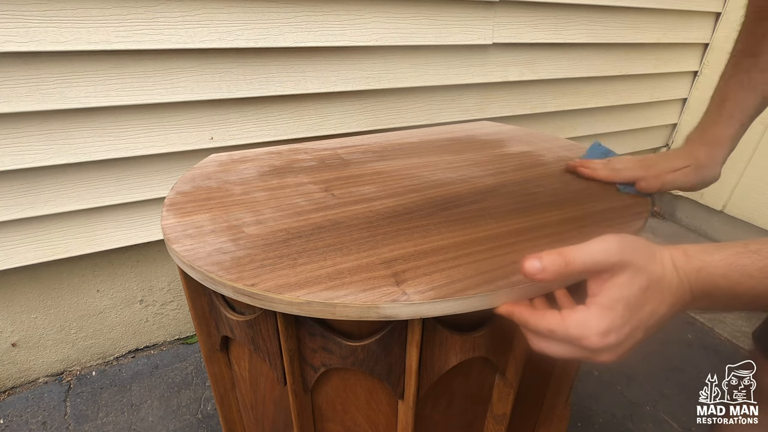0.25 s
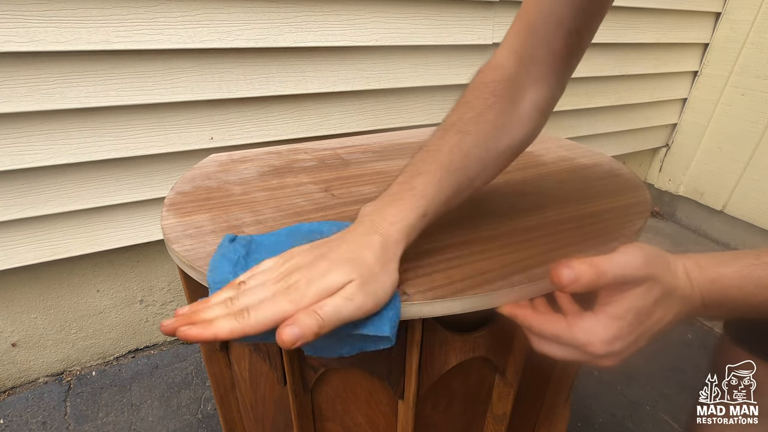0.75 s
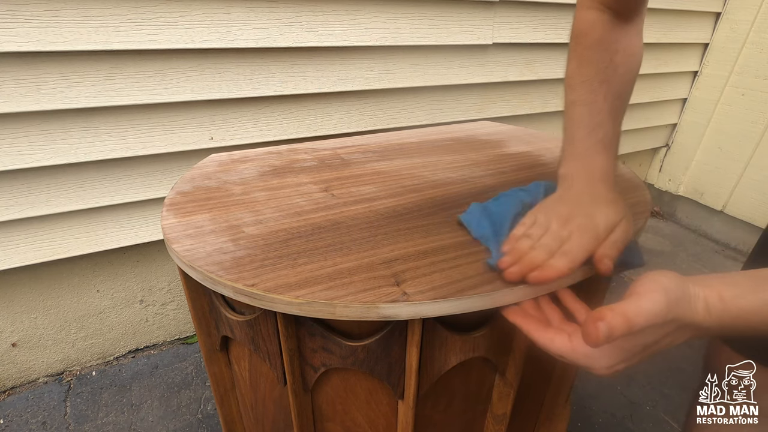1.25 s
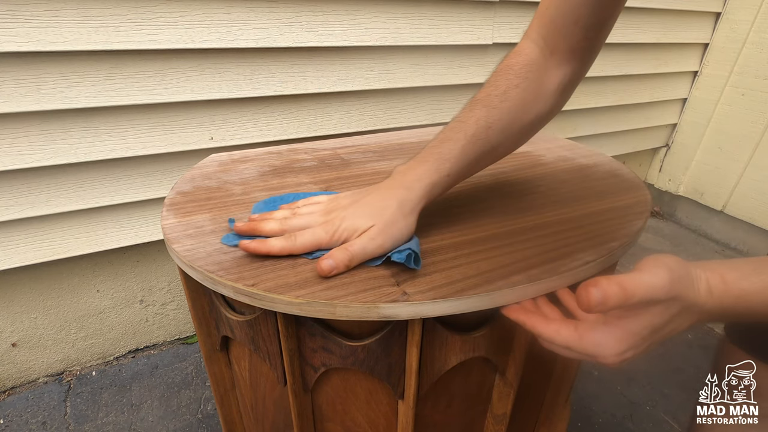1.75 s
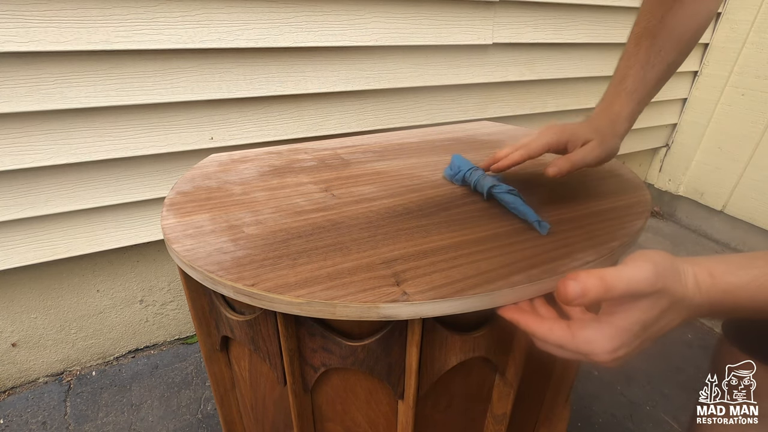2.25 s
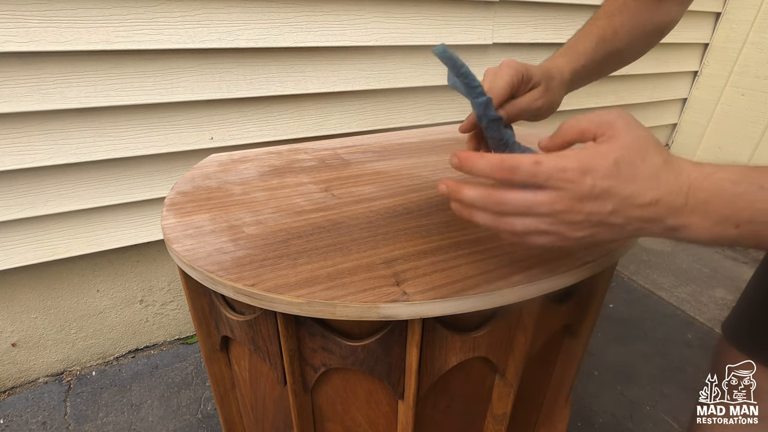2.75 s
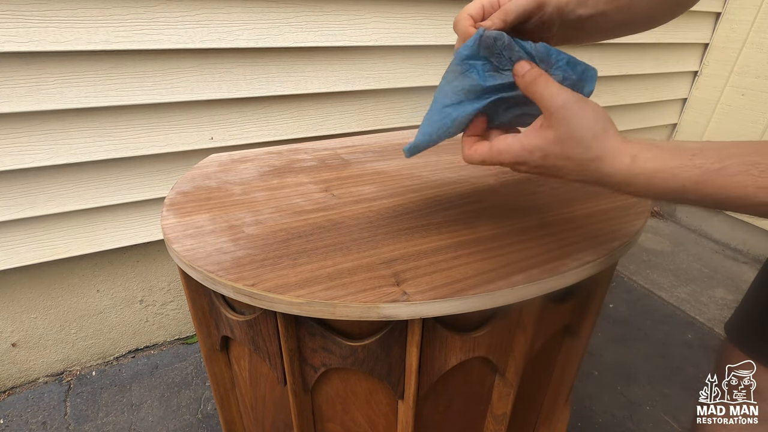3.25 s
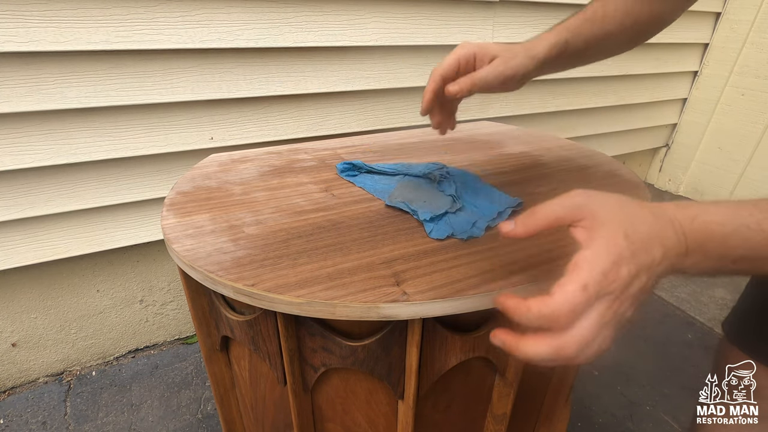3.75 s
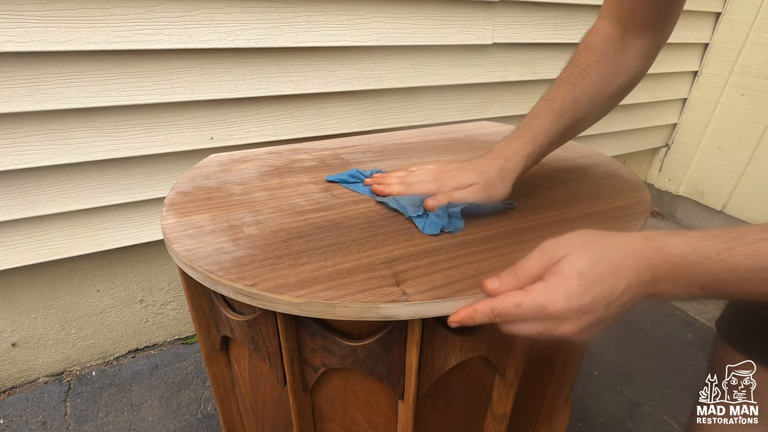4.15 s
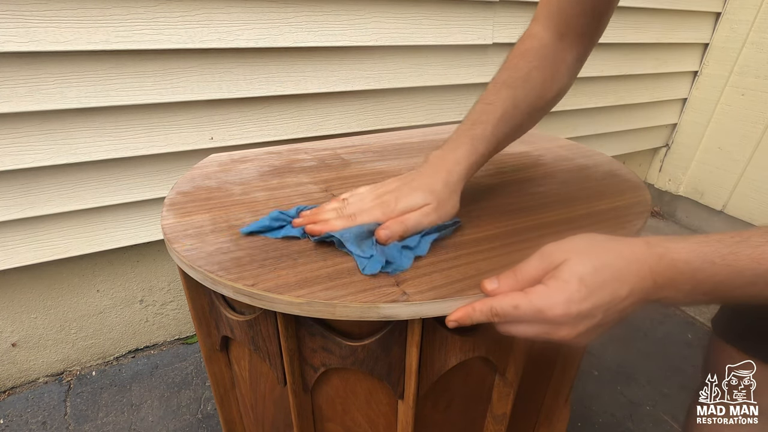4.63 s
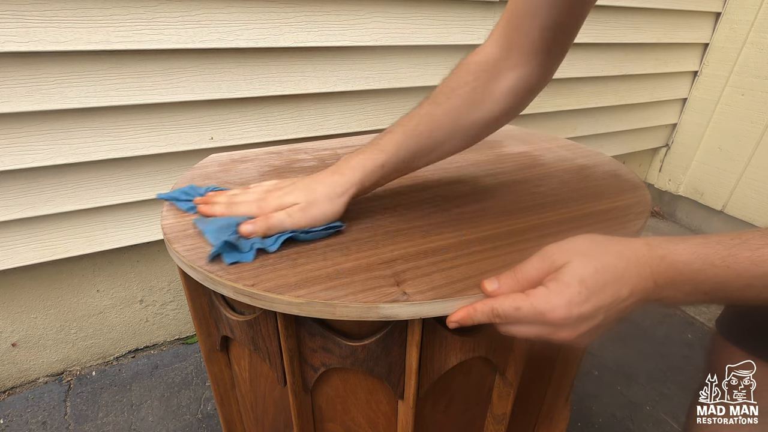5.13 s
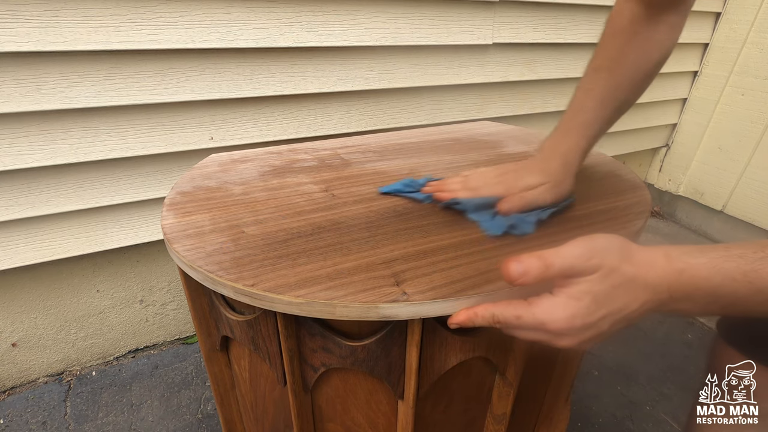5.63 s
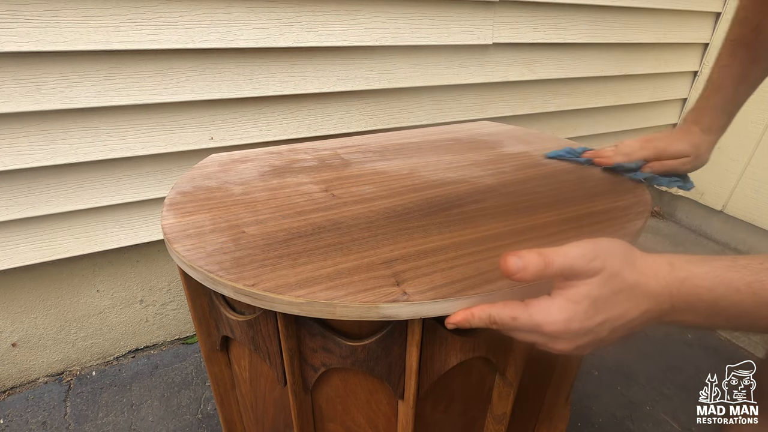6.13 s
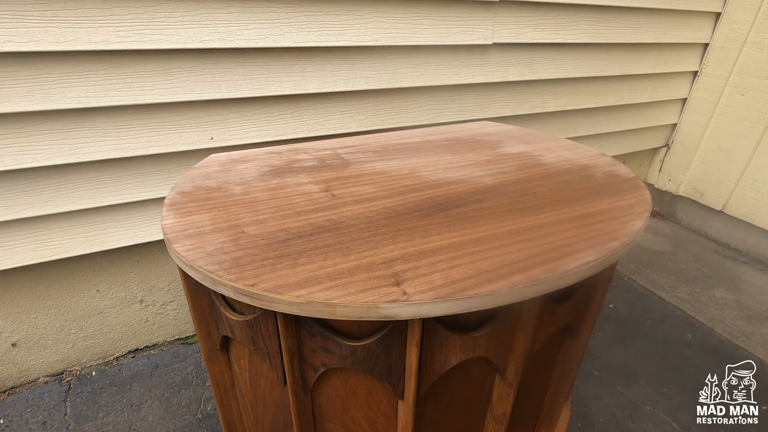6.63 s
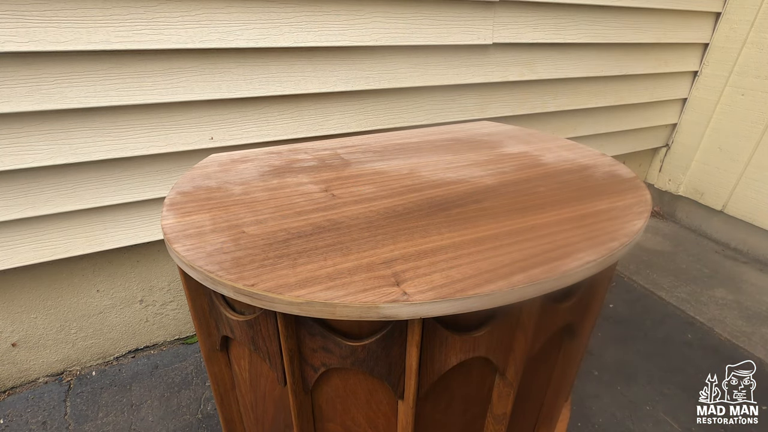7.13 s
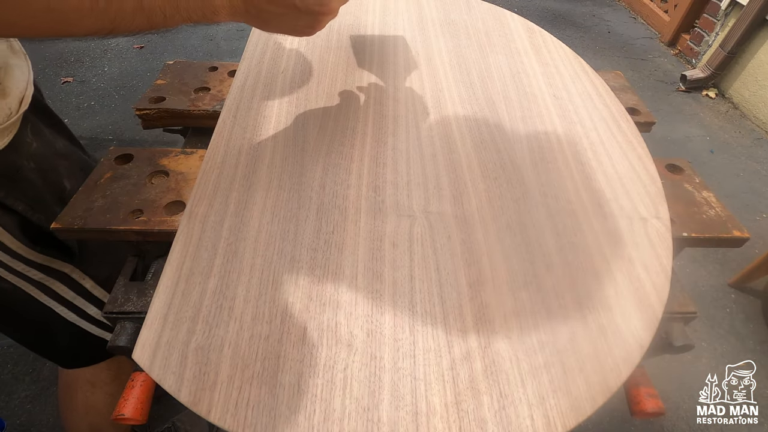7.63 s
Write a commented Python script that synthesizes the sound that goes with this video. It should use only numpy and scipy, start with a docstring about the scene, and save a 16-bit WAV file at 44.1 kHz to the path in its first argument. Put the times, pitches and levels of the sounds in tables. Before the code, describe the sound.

Close stereo pickup of cloth wiping bare wood: breathy, grainy strokes that brighten with speed and hush at each turn. Low wooden knocks and a few dry clacks come mostly at the start and around two seconds. The cloth is unfolded and dropped flat with a soft slap, then wiping resumes faster. Outdoor rumble and thin insect chirring continue until a tiny click brings a plain low hum.

```python
"""Outdoors beside a house wall: a damp towel wipes a round wooden table in two spells of strokes. Fibre-slip
impulses, coloured by stroke effort, make the rub; struck modes make the table rock and clack. Between the
spells the towel is unfolded and dropped flat: shaped noise swishes and pats. Narrow noise bands give crickets
over a low rumble; late on, the background switches with a small click to a steady motor hum."""
import sys
import numpy as np
from scipy import signal
from scipy.fft import rfft, irfft, next_fast_len
from scipy.io import wavfile
from scipy.ndimage import uniform_filter1d

SR = 44100
rng = np.random.default_rng(int(sys.argv[2]) if len(sys.argv) > 2 else 0)


def transcribe(signal):
    """Save signal, clipped to [-1, 1], as a 16-bit WAV file at the path in sys.argv[1]."""
    frames = np.atleast_2d(signal).T
    limited = np.clip(frames, -1, 1)
    pcm = np.round(limited * 32767).astype(np.int16)
    wavfile.write(sys.argv[1], SR, pcm)


N = 347409
T = np.arange(N) / SR
SIZE = next_fast_len(N)
FREQS = np.maximum(np.fft.rfftfreq(SIZE, 1 / SR), 1)
SIDES = np.array([[.5], [-.5]])  # left, right: half of a left-right difference each
SWITCH_S = 7.381  # background switches to the hum
TOP_HZ = 15700


def wiping():
    """Fibres slip over the grain: louder and brighter as the hand speeds up, hushed at each turn."""
    # towel strokes: start/s, end/s, speeding up/s, slowing down/s, mid-stroke level/dB,
    # lean (gain from start to end)/dB, fibre hiss/dB, wood tone/dB
    stroke_rows = [(-0.02, 0.069, 0.024, 0.063, -59.5, -5, 5, 3.0),
                   (0.063, 0.378, 0.092, 0.096, -56.5, -2, 1.0, -2.5),
                   (0.392, 0.943, 0.079, 0.1, -57.5, 8.5, 4.5, -0.5),
                   (0.939, 1.327, 0.15, 0.074, -56, -11.5, 2.5, -1),
                   (1.331, 1.781, 0.11, 0.18, -55.5, 7.5, 1, 1.5),
                   (1.736, 2.114, 0.14, 0.11, -57.5, 13.0, 1.5, -1.5),
                   (2.084, 2.307, 0.014, 0.18, -65, -4.5, 5.5, 0.5),
                   (4.186, 4.298, 0.036, 0.036, -66.5, -1.0, -2.0, -4),
                   (4.275, 4.676, 0.13, 0.24, -52.5, 7.5, 2, 0),
                   (4.593, 4.843, 0.071, 0.066, -54, -3, 5.0, 1),
                   (4.768, 5.033, 0.087, 0.045, -52.5, -13, 3, 0),
                   (4.988, 5.18, 0.09, 0.039, -51.5, -11.5, 3, -1.5),
                   (5.126, 5.375, 0.11, 0.051, -52.5, -11.5, 5, -0.5),
                   (5.313, 5.707, 0.091, 0.054, -54, -13, 2.5, -2),
                   (5.68, 6, 0.12, 0.12, -53, 10, 2.0, -2.5),
                   (5.998, 6.401, 0.091, 0.036, -56, -10.5, 4, -0.5)]
    # colour of cloth on wood: f/Hz, level/dB
    rub_colour = [(290, -43), (500, -26.5), (840, -17), (970, -11.5), (1290, -6.5), (1430, -4),
                  (2320, 0.06), (4010, -0.4), (6450, -8.5), (7130, -14.8), (8590, -11.5), (10100, -19),
                  (12300, -24), (15500, -35)]
    firm_db = -57  # reference stroke level
    hiss_per_db, wood_per_db = 0.54, -0.5  # a faster stroke is hissier and less woody
    colour_limit_db = 7
    grip_db, grip_colour_db = 1.5, 0.1  # rms: the cloth grips unevenly

    power = np.array([stroke(*row[:6]) for row in stroke_rows]) ** 2
    total = power.sum(axis=0) + 1e-12
    # each stroke lays the cloth differently; overlaps weighted by power
    hiss_db, wood_db = np.array(stroke_rows)[:, -2:].T @ power / total
    effort_db = 10 * np.log10(total) - firm_db

    colour = amp(across(rub_colour))
    direct = shape(slips(per_s=16000, spread_db=1.0), colour)
    echoes = noise(colour, channels=2)  # the moving hand's echoes blur into noise
    rub = ports(direct, echoes, echo_db=1)
    board = filtered(rub, below(hz=2070))
    fibres = rub - filtered(rub, below(hz=5800))
    middle = rub - board - fibres

    def tint(db):
        """Limited band gain, with uneven grip."""
        uneven_db = db + grip_colour_db * walk(rate=27)
        return amp(np.clip(uneven_db, -colour_limit_db, colour_limit_db))

    board = board * tint(wood_db + wood_per_db * effort_db)
    fibres = fibres * tint(hiss_db + hiss_per_db * effort_db)
    drag = np.sqrt(total) * amp(grip_db * walk(rate=12.5))
    return (middle + board + fibres) * drag


def stroke(start, end, rise_s, fall_s, db, lean_db):
    """Strength of one stroke: the hand speeds up, leans in or eases off, and slows to the turn."""
    ramp = np.clip(np.minimum((T - start) / rise_s, (end - T) / fall_s), 0, 1)
    progress = np.clip((T - start) / (end - start), 0, 1)
    return np.sin(np.pi / 2 * ramp) * amp(db + lean_db * (progress - .5))


def table():
    """The cabinet rocks under the hand: it booms, its loose panels rattle, and the wood clacks."""
    # table rocking on its base: t/s, level/dB, contact time/s
    rock_rows = [(0.054, -39, 0.0067), (.083, -37, 0.0057), (.103, -34, 0.0015), (0.111, -40.5, 0.002),
                 (.132, -31, 0.0037), (0.952, -44.5, 0.0041), (0.991, -36, 0.0071), (1.841, -34.5, 0.0079),
                 (2.136, -49, 0.0024), (2.185, -42, 0.0027), (2.213, -38.5, 0.0085), (2.666, -51, 0.0067),
                 (4.148, -37.5, 0.0088), (6.003, -40, 0.0046), (6.031, -44, 0.005)]
    # cabinet modes, detuned slightly per strike: f/Hz, level/dB, t60/s
    cabinet_modes = [(93.9, 5.5, 0.11), (145, -2, 0.056), (194, -7.5, 0.1), (244, -10.5, 0.14),
                     (300.8, -11.5, 0.22), (380.6, -5.5, 0.14), (480, -18, .18), (602, -13, 0.14),
                     (665, -19, 0.24), (754, -9, 0.1), (940, -20, .1)]
    # wood clacking on wood: t/s, level/dB, contact time/s
    clack_rows = [(.081, -48, 0.00051), (0.125, -38, 0.00066), (0.15, -53, 0.0007), (.950, -39.5, 0.00068),
                  (2.134, -43, 0.00048), (2.14, -39, 0.0011), (2.181, -54, 0.00026)]
    # clacking joint's modes, detuned slightly per strike: f/Hz, level/dB, t60/s
    joint_modes = [(753, -5, 0.029), (989, -8, 0.066), (1230, 5.5, 0.023), (1372, -1.5, 0.024),
                   (1614, -12, 0.072), (1950, -2, 0.032), (2360, -2, 0.065)]

    boom, clacks = np.zeros(N), np.zeros(N)
    for s, db, contact_s in rock_rows:
        add(boom, s, amp(db) * strike(cabinet_modes, contact_s, spread_db=0.2))
    for s, db, contact_s in clack_rows:
        add(clacks, s, amp(db) * strike(joint_modes, contact_s, spread_db=1.0))
    clacks = filtered(clacks, 1 - below(hz=716))  # a small joint radiates no bass

    swing = uniform_filter1d(np.abs(boom), SR // 200)
    settle = np.exp(-1 / (0.017 * SR))  # the panels chatter on a little after each swing
    swing = signal.lfilter([1 - settle], [1, -settle], swing)
    hardness = (swing / swing.max()).clip(0) ** 1.4  # hard swings rattle far more than soft ones
    chatter = shape(slips(per_s=2700, spread_db=4.5), hump(hz=470, octaves=0.69))
    rattle = amp(-10.0) * swing * hardness * chatter
    out = boom + rattle + clacks
    return ports(out, siding(out, echo_s=0.039), echo_db=4.5)


def strike(modes, contact_s, spread_db):
    """Modes after one push: a longer contact is duller, and each spot favours other modes."""
    t = T[:SR // 2]
    chance = rng.standard_normal((len(modes), 2))
    ringing = np.zeros(len(t))
    for (hz, db, t60_s), (level, detune) in zip(modes, chance):
        decay = amp(db + spread_db * level - 60 * t / t60_s)
        ringing += decay * np.cos(2 * np.pi * hz * (1 + .005 * detune) * t)
    push = np.sin(np.pi * np.minimum(T[:SR // 50] / contact_s, 1)) ** 2
    return signal.fftconvolve(ringing, push / push.sum())


def handling():
    """The towel swishes as it is unfolded; fingers and wet cloth pat the top."""
    # hands, sleeves and towel brushing: t/s, level/dB, centre f/Hz, Gaussian half-length/s
    rustle_rows = [(0.052, -62.5, 420, .035), (1.857, -63, 8000, 0.017), (2.682, -74.5, 2200, .009),
                   (2.811, -65.5, 4700, 0.031), (3.149, -68, 5500, 0.034), (3.167, -60, 187, 0.051),
                   (3.172, -76, 2620, .15), (3.51, -70, 1480, 0.03), (3.534, -77, 5000, 0.048),
                   (3.596, -70.5, 1900, .011), (4.137, -67, 2100, .012), (6.805, -64.5, 1600, .01),
                   (6.823, -64.5, 5140, 0.011), (7.259, -68, 2150, 0.01)]
    # pats of fingers and wet cloth: t/s, level before pat_gain_db/dB, centre f/Hz, width/octaves, decay/s
    pat_rows = [(0.506, -58.5, 2740, 0.25, 0.011), (1.001, -53, 3720, 0.5, .008),
                (1.836, -65, 1200, 1.1, 0.023), (2.178, -53.5, 2030, 0.87, 0.014),
                (3.042, -66.5, 2970, 0.41, 0.0066), (3.8202, -57.5, 1600, 1.6, 0.004),
                (3.8265, -42.5, 2240, 1.1, 0.0022), (3.832, -52, 1430, 1.05, 0.01),
                (6.013, -59.5, 2340, 0.93, 0.0063), (7.238, -63.5, 1950, 0.98, 0.0084)]
    pat_gain_db, attack_s = 7.0, 0.0021  # cloth cushions the attack
    cloth_top_hz = 8000

    out = np.zeros(N)
    folds = slips(per_s=7000, spread_db=2)
    for s, db, hz, length_s in rustle_rows:
        swell = np.exp(-.5 * ((T - s) / length_s) ** 2)
        out += amp(db) * swell * shape(folds, hump(hz, octaves=0.82))

    splash = rng.standard_normal(N)
    t = T[:SR // 4]
    for s, db, hz, octaves, decay_s in pat_rows:
        grain = shape(splash, hump(hz, octaves))[int(s * SR):][:len(t)]
        envelope = (1 - np.exp(-t / attack_s)) * np.exp(-t / decay_s)
        add(out, s, amp(db + pat_gain_db) * grain * envelope)
    out = filtered(out, np.sqrt(below(cloth_top_hz)))  # damp cloth has a soft top
    return ports(out, siding(out, echo_s=0.023), echo_db=-2.0)


def siding(x, echo_s):
    """The wall scatters a short, different echo towards each port."""
    scatter = rng.standard_normal((2, N)) * np.exp(-T / echo_s) * (T > .002)
    scatter /= np.sqrt(np.sum(scatter ** 2) / 2)
    return filtered(x, rfft(scatter, SIZE))


def ports(direct, diffuse, echo_db):
    """Two microphone ports hear the direct sound a little apart, and a diffuse share of their own."""
    # port level difference: f/Hz, left minus right/dB
    port_balance = [(60, 2.5), (170, 3), (350, 0.7), (1200, -0.5), (2400, 1.8), (4400, 1.2), (8100, -2),
                    (14000, -4)]
    # port phase difference: f/Hz, left lead/rad
    port_phase = [(60, 0), (200, -0.17), (600, -0.8), (1500, -0.45), (3300, -0.83), (5200, -1.4),
                  (6400, -1.97), (8400, -1.34), (14000, -1.7)]
    # diffuse share against direct, before echo_db: f/Hz, level/dB
    wall_echo = [(60, -27), (250, -16), (1000, -10), (2500, -7.5), (5000, -3), (9000, -4), (14000, 18)]

    echo = amp(across(wall_echo) + echo_db)
    gain = amp(SIDES * across(port_balance)) / np.sqrt(1 + echo ** 2)
    lead = np.exp(1j * SIDES * across(port_phase))
    return filtered(direct, gain * lead) + filtered(diffuse, gain * echo)


def crickets():
    """One cricket chirps in even bursts of wing strokes over a steady far chorus, all towards the left."""
    # far insects that never pause: f/Hz, width/Hz, level before the left-right tilt/dB
    far_insects = [(6650, 410, -82), (7200, 260, -102), (7760, 170, -88)]
    # chirp level, before the left-right tilt: t/s, level/dB
    cricket_level = [(1.4, -78.5), (2.2, -76)]
    chirp_at_s, chirp_every_s, chirp_drift_s = 2.25, .287, 0.014
    chirp_s, chirp_edge_s = 0.127, .012
    wing_hz = 82

    age_s = (T - chirp_at_s + chirp_drift_s * walk(rate=1)) % chirp_every_s
    gate = np.clip(np.minimum(age_s, chirp_s - age_s) / chirp_edge_s, 0, 1)
    gate = gate * amp(np.interp(T, *np.transpose(cricket_level)))
    wing_phase = 2 * np.pi * np.cumsum(wing_hz * (1 + 0.049 * walk(rate=4.0))) / SR
    wings = 1 + 0.12 * np.sin(wing_phase)
    chirps = gate * wings * noise(resonance(hz=6585, width_hz=180), channels=2)
    chorus = sum(amp(db) * noise(resonance(hz, width_hz), channels=2) for hz, width_hz, db in far_insects)
    return amp(SIDES * 6.1) * (chirps + chorus)


def outdoors():
    """A low rumble whose deepest part slowly swells, under thin, diffuse air noise."""
    # level of the deep rumble: t/s, level/dB
    rumble_level = [(0, -53.5), (2.4, -53), (4.0, -52), (6.2, -46), (6.8, -48), (7.4, -45.5)]
    # rumble colour: f/Hz, level/dB
    rumble_colour = [(12, -51.5), (20, -11.5), (43, 3), (64, 0.5), (114, -9), (145, -19), (201, -18),
                     (290, -29), (330, -33.5), (403, -37), (506, -48), (600, -46.5), (780, -78),
                     (1320, -120)]
    # air colour: f/Hz, level/dB
    air_colour = [(290, -11), (500, -5.5), (608, -11), (666, -6.5), (826, -8.5), (974, -1.5), (1390, -1),
                  (1920, -6.5), (5800, -16.5), (7540, -58), (12800, -120)]
    # thin treble hiss colour: f/Hz, level/dB
    hiss_colour = [(4500, -25), (6000, -2), (8000, -2.5), (10000, -13.5), (15500, -20)]

    drone = noise(amp(across(rumble_colour)), channels=3)
    deep = filtered(drone, below(hz=137))
    deep_db = np.interp(T, *np.transpose(rumble_level)) + 0.27 * walk(rate=9.2)
    rumble = deep * amp(deep_db) + amp(-48.0) * (drone - deep)

    air = noise(amp(across(air_colour)), channels=3) * amp(-75 + 0.78 * walk(rate=9.1))
    air = air + amp(-87) * noise(amp(across(hiss_colour)), channels=3)
    low = ports(rumble[0], rumble[1:], echo_db=5.0)
    high = ports(air[0], air[1:], echo_db=8.5) * amp(SIDES * 3.3)
    return low + high


def hum():
    """A motor hums steadily, one sine in quieter air; the insects are far off."""
    # air around the hum: f/Hz, level/dB
    still_colour = [(20, -8.5), (55, 0), (120, -1.5), (180, 0.5), (280, -11.5), (400, -19.5), (600, -30.5),
                    (1200, -30), (2500, -38), (5000, -44), (8000, -51), (10000, -55.5), (15500, -56)]
    hum_hz, hum_db = 102.2, -45.5  # rms level

    tone = amp(hum_db) * np.sqrt(2) * np.sin(2 * np.pi * hum_hz * T)
    air = amp(-59.5) * noise(amp(across(still_colour)), channels=3)
    bands = resonance(hz=6430, width_hz=420) + amp(-4.0) * resonance(hz=7700, width_hz=330)
    insects = amp(-90.5) * noise(bands, channels=2)
    return ports(tone + air[0], air[1:], echo_db=6.5) + insects


def slips(per_s, spread_db):
    """Tiny impulses of uneven size: fibres or panels catching and letting go."""
    hits = rng.random(N) < per_s / SR
    return hits * rng.standard_normal(N) * amp(spread_db * rng.standard_normal(N))


def walk(rate):
    """Slow chance with spread 1; rate in Hz."""
    return noise(np.exp(-(FREQS / rate) ** 2))


def noise(gain, channels=1):
    """Unrelated noises of a given colour."""
    return shape(np.squeeze(rng.standard_normal((channels, N))), gain)


def shape(x, gain):
    """Filter to a colour, at rms 1."""
    return unit(filtered(x, gain))


def filtered(x, gain):
    """Filter by a gain per frequency."""
    return irfft(rfft(x, SIZE) * gain, SIZE)[..., :N]


def resonance(hz, width_hz):
    """Gain of a resonance peak."""
    return 1 / (1 + ((FREQS - hz) / width_hz * 2) ** 2)


def hump(hz, octaves):
    """Gain of a broad bell on the octave scale."""
    return np.exp(-.5 * (np.log2(FREQS / hz) / octaves) ** 2)


def below(hz):
    """Gain of a steep low-pass."""
    return 1 / (1 + (FREQS / hz) ** 4)


def across(points):
    """(Hz, value) points joined on a log-frequency axis."""
    hz, value = np.transpose(points)
    return np.interp(np.log(FREQS), np.log(hz), value)


def amp(db):
    """Decibels to gain."""
    return 10 ** (np.asarray(db) / 20)


def unit(x):
    """Scale to rms 1."""
    return x / np.sqrt(np.mean(x ** 2))


def add(track, s, sound):
    """Mix a sound in at a time."""
    start = max(int(s * SR), 0)
    track[start:start + len(sound)] += sound[:N - start]


def scene():
    """The work on the table, over a background that changes with a small click."""
    later = np.clip((T - SWITCH_S) / 0.00094, 0, 1)
    click = amp(-45.5) * np.exp(-np.abs(T - SWITCH_S) / 0.00093) * (T >= SWITCH_S)
    work = wiping() + table() + handling()
    background = (1 - later) * (outdoors() + crickets()) + later * hum()
    return work + background + click


def record(dry):
    """A steep elliptic low-pass cuts the top."""
    return signal.sosfilt(signal.ellip(10, .2, 80, TOP_HZ, fs=SR, output="sos"), dry)


dry = scene()
out = record(dry)
transcribe(out)
```